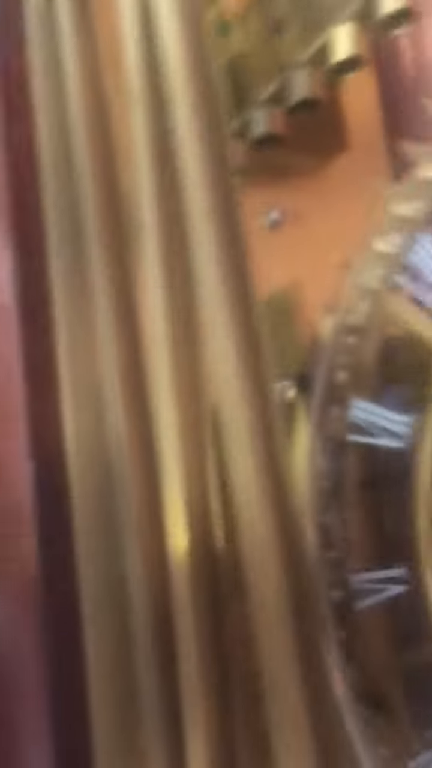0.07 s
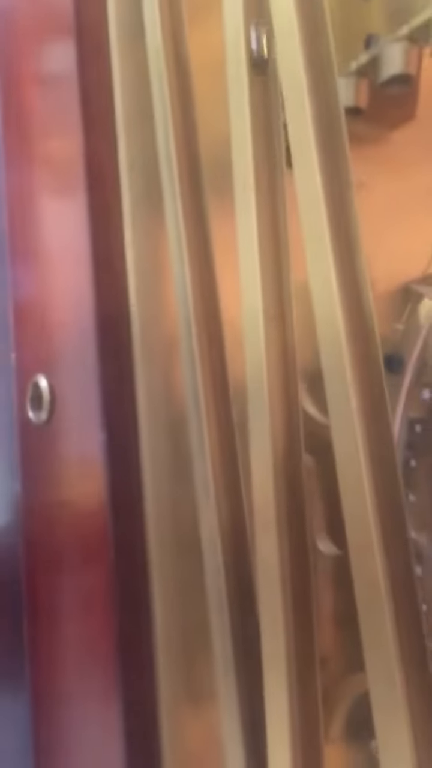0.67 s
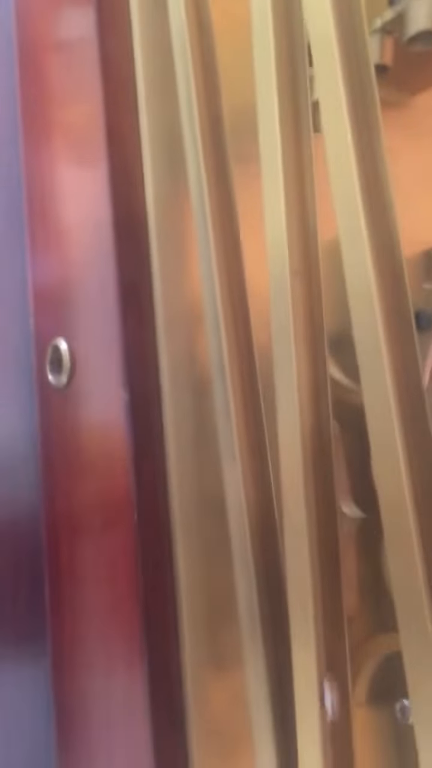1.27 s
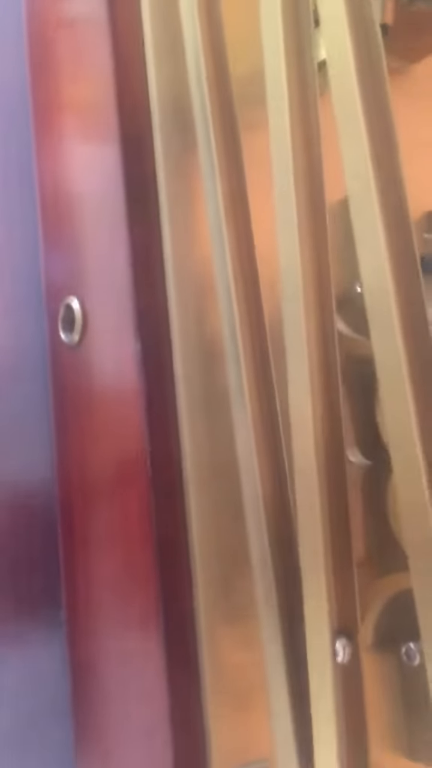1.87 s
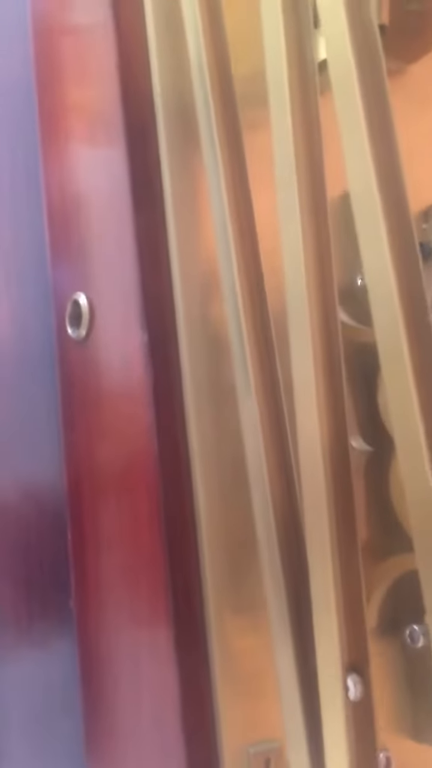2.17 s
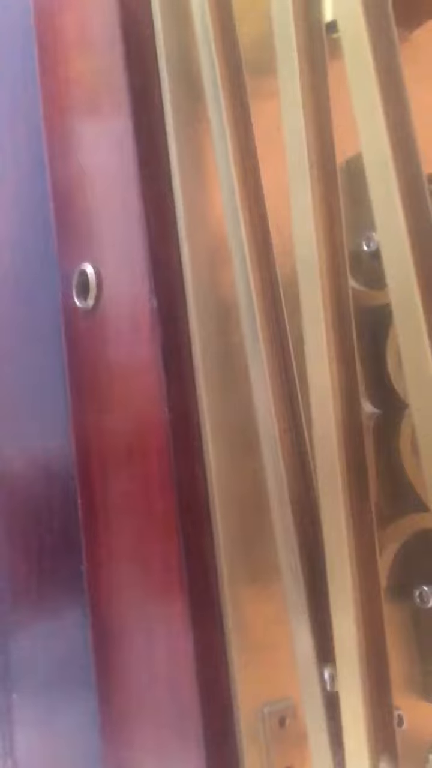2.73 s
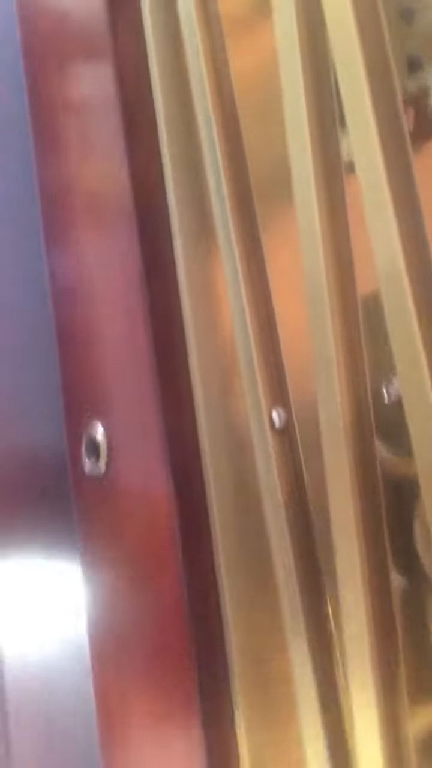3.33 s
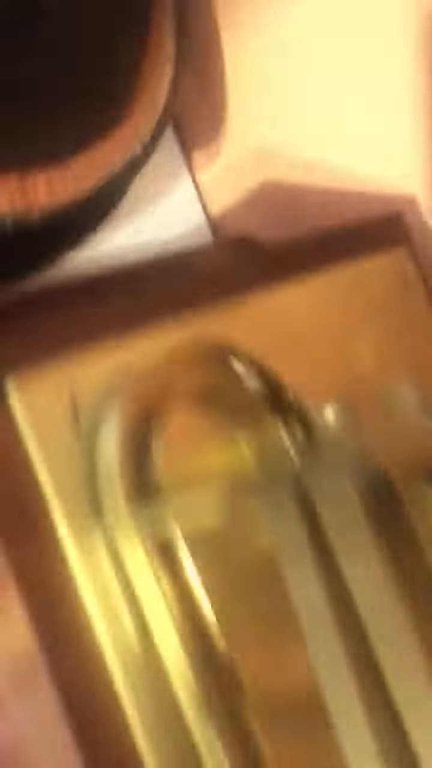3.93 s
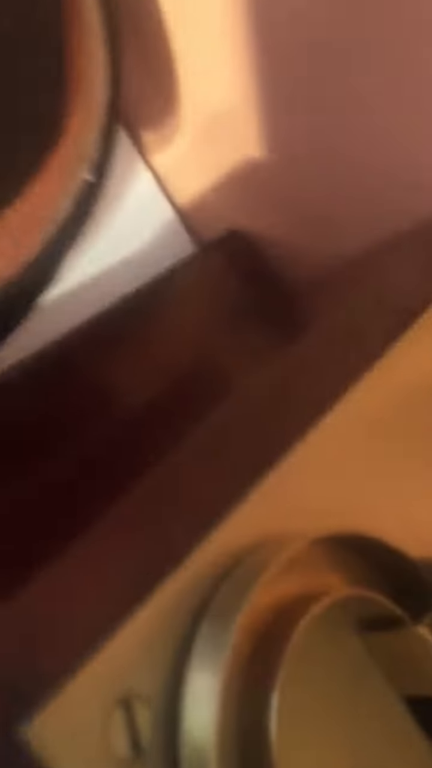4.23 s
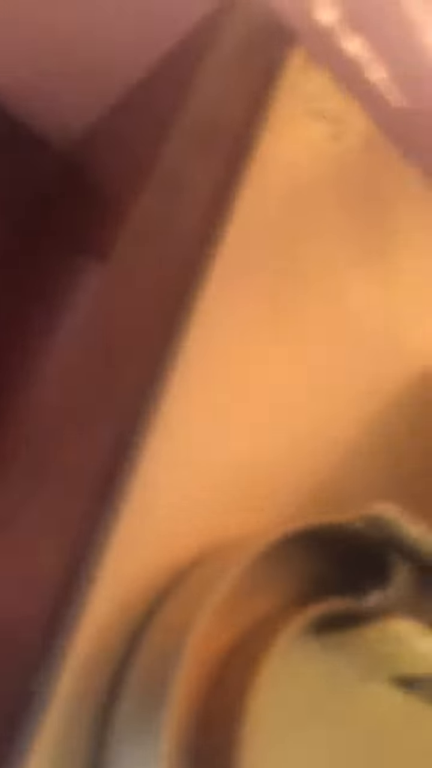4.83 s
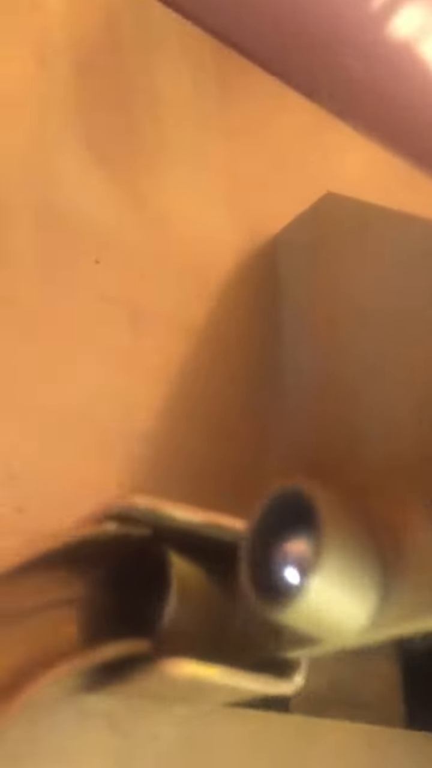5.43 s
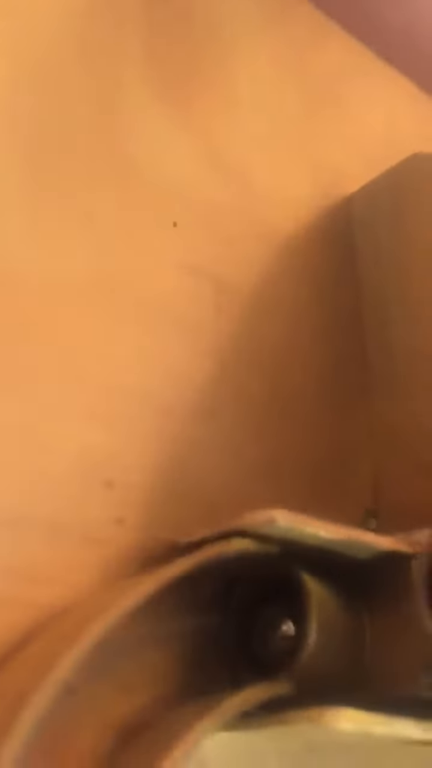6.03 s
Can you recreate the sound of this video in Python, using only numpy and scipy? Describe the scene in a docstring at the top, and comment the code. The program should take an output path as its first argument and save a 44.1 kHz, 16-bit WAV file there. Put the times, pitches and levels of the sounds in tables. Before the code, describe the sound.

A steel ball rattles and rolls along ringing brass tracks, then drops into a pocket as clockwork ticks and knocks in a wooden case.

```python
"""A small steel ball rattles out of a chute and rolls down a brass track, making the metal ring.
It clacks over a crossover, runs back along a second track, rounds a bend and drops into a pocket.
Two escapements (the ticking parts of clockwork), a catch and a lever, ping throughout, and the works
knock in their wooden case. Underneath are a low throb, about three a second, probably the drive
turning, a soft whirr and faint room air."""
import sys
import numpy as np
from scipy import signal
from scipy.fft import rfft, irfft
from scipy.io import wavfile
from scipy.ndimage import uniform_filter1d

SR = 44100
rng = np.random.default_rng(int(sys.argv[2]) if len(sys.argv) > 2 else 0)


def unload_audio(sound):
    """Save the sound as a 16-bit wav file, at the path given as the first command line argument."""
    columns = np.transpose(np.atleast_2d(sound))
    # keep every value between -1 and 1, then stretch to whole-number steps
    steps = np.round(np.clip(columns, -1, 1) * 32767)
    wavfile.write(sys.argv[1], SR, steps.astype(np.int16))


N = 269010
TIME = np.arange(N) / SR
FILTER_HZ = np.fft.rfftfreq(4096, 1 / SR)

# Levels in the tables are relative. A mode is a note that an object rings at, and its ring time is
# how long it takes to fade by 60 dB. "Low boost" turns the lower part of a sound up or down.

# Stretches of rolling. Each row: start in seconds, first level, last level and low boost in dB.
ROLLS = [(0, -33, -34.5, 5.5), (0.09, -28.5, -39.5, 6), (0.286, -67.5, -75.5, 5.5),
         (0.773, -37.5, -31.5, -1.5), (1.7, -51.5, -103.5, 1), (2.2, -84, -51, 7), (2.63, -42.5, -33.5, 5),
         (2.733, -59, -72, 4.5), (2.93, -62, -35, -2), (3.821, -39.5, -40, 5), (3.99, -34, -36.5, 2),
         (4.085, -43, -46.5, 3), (4.221, -61, -73, -1)]
STOP_S = 4.39
SPEED_POWER = 4.4  # how steeply the rolling noise grows with speed
DULL_PER_DB, BRISK_DB = 0.306, -27.5  # low boost added for each dB of rolling softer than BRISK_DB
# When the ball leaves the chute, the first track, the crossover and the return track, in seconds.
LEAVE_TIMES = [.6, 2.6, 2.9, 3.97]
# The ball drops and bounces. Each row: time in seconds, then level, low boost and ring gain in dB.
LANDINGS = [(.001, -28, 1.5, 3.5), (0.081, -6, 7.5, -13.5), (0.1311, -9.5, 5, -11), (0.175, -14.5, 6, -12),
            (0.207, -17.5, 6.5, -9.5), (.229, -23, -0.5, -5.5), (0.246, -25.5, 2, -4),
            (1.6576, -23, -4, 2.5), (1.672, -26.5, -1, 2), (2.6227, -16, -4, -6.5), (2.6337, -3, -1, -17.5),
            (2.6594, -8.5, 2.5, -14.5), (2.6913, -21, 2.5, -7.5), (3.988, -14.5, -5, -16),
            (4.2297, -14.5, -0.5, -21), (4.334, -22, 1, -26), (4.361, -36, 3, -19)]
SECOND_RAIL_S, SECOND_RAIL_DB = .0068, -5.5  # a landing ball meets one rail, then the other
# Light clacks at lips and joints. Each row: time in seconds, level in dB.
CLACKS = [(0.7047, -53.5), (0.768, -39.5), (0.7984, -35), (1.6255, -22), (2.7559, -39), (2.925, -57.5),
          (3.029, -46.5), (3.116, -52), (3.1766, -41), (3.326, -38.5), (3.3914, -39), (3.8349, -27.5),
          (3.859, -29), (4.06, -41)]
CLACK_LOW_DB, CLACK_RING_DB = -3.5, 4

# Clear modes of each part's frame (low) and rails (high). Each row: pitch in Hz, level in dB.
CHUTE_FRAME = [(1233, -58.5), (2272, -57.5), (2686, -67), (3128, -49.5), (3386, -60), (3704, -67.5),
               (4075, -59), (4151, -56), (4398, -61.5), (4597, -62.5), (4815, -48.5), (5335, -58),
               (5626, -57.5), (5830, -62)]
CHUTE_RAILS = [(6309, -46), (6546, -42), (6724, -44), (6826, -38.5), (7031, -39.5), (7106, -35.5),
               (7305, -44.5), (7644, -52), (8123, -41.5), (8333, -45.5), (8861, -48.5), (9109, -52.5),
               (9421, -65), (9582, -60)]
FIRST_FRAME = [(370, -70.5), (620, -68), (1020, -75.5), (1244, -59.5), (1367, -65.5), (2046, -65.5),
               (2169, -67.5), (2277, -66), (2649, -64), (2760, -78), (2923, -65), (3230, -61), (3779, -68),
               (4250, -75), (4570, -65), (4732, -73), (5254, -60), (5631, -71)]
FIRST_RAILS = [(6158, -54.5), (6277, -45), (6541, -46), (6638, -49), (6724, -42), (6821, -47.5),
               (7009, -37.5), (7101, -48.5), (7316, -57.5), (7467, -42), (7795, -61.5), (8134, -47),
               (8258, -55), (8344, -42.5), (8678, -41.5), (9109, -53.5), (9582, -68)]
CROSS_FRAME = [(1244, -52.5), (1890, -55.5), (2401, -77.5), (2589, -57.5), (2950, -68), (3219, -45.5),
               (3542, -69), (3828, -76), (4204, -74), (4549, -59), (5313, -61), (5857, -65)]
CROSS_RAILS = [(6358, -63.5), (6535, -55.5), (6745, -47.5), (6783, -48), (7025, -41.5), (7343, -50.5),
               (7564, -50.5), (7768, -40.5), (8113, -50.5), (8242, -69), (8349, -46), (8484, -51),
               (8640, -55.5), (8958, -53)]
RETURN_FRAME = [(600, -64), (1020, -66.5), (1250, -62), (1340, -69.5), (1863, -72), (2030, -72),
                (2272, -73), (2821, -71), (3252, -60.5), (3483, -92), (4075, -86), (4597, -75), (4775, -63),
                (5308, -75), (5825, -65)]
RETURN_RAILS = [(6013, -58), (6385, -49.5), (6751, -47), (6858, -42), (6950, -48.5), (7171, -52),
                (7483, -61), (7779, -54), (8021, -52.5), (8236, -60), (8349, -47.5), (8640, -61.5)]
BEND_FRAME = [(1717, -62), (2062, -65), (2315, -46), (2611, -72), (2815, -64), (3246, -78.5), (4091, -69),
              (4447, -75), (4818, -71), (5841, -79)]
BEND_RAILS = [(6794, -54), (7364, -60), (7477, -47), (7612, -48), (8027, -49.5), (8226, -60), (8640, -44),
              (8721, -48), (8969, -72)]
# The crowd of weaker modes between the clear ones. Each row: frequency in Hz, level in dB.
CHUTE_CROWD = [(88, -50), (150, -25), (240, -25), (448, -30), (605, -23.5), (800, -38.5), (900, -21.5),
               (1050, -19.5), (1490, -25), (2570, -14.5), (4300, -15.5), (5390, -11), (7150, 2), (9160, -4),
               (10200, -27.5), (13200, -57), (22000, -120)]
FIRST_CROWD = [(150, -49), (230, -18), (400, -30), (664, -24.5), (1070, -18), (1240, -32), (1510, -22),
               (2090, -13.5), (4010, -14), (4990, -13.5), (7240, 2.5), (8990, -19.5), (9420, -18.5),
               (10200, -63.5), (13200, -91), (22000, -120)]
CROSS_CROWD = [(150, -58.5), (250, -27), (551, -22), (780, -29), (964, -11.5), (1090, -24.5), (1250, -19.5),
               (1510, -19.5), (2640, -9.5), (3890, -18), (7580, 1), (8990, -3.5), (10200, -36.5),
               (13200, -71), (22000, -120)]
RETURN_CROWD = [(150, -67), (250, -28), (450, -27.5), (590, -16.5), (750, -36), (980, -7), (1140, -50),
                (1270, -10), (1560, -36), (1950, -9.5), (2640, -18), (5070, -12.5), (7020, 2), (8990, -2),
                (10200, -40), (13200, -65), (22000, -120)]
BEND_CROWD = [(150, -24), (250, -10), (411, -41), (535, -13.5), (729, -13.5), (1180, -21), (1290, -18),
              (2600, -6.5), (5070, -12), (7350, 4), (8990, -2), (9720, -26), (10200, -77), (13200, -105),
              (22000, -120)]
# Gaps where a part lacks modes. Each row: centre in Hz, half-width in Hz, gain in dB (mostly a cut).
CHUTE_GAPS = [(1620, 29, -10), (1927, 55, -15), (2978, 70, -13.5), (3570, 60, -15), (3880, 210, -6),
              (4220, 87, -8.5), (5200, 360, -5), (5730, 84, -8.5), (6900, 130, -16), (7740, 110, -14)]
FIRST_GAPS = [(800, 100, -13.5), (1510, 60, -6.5), (2436, 110, -8), (2993, 54, -2), (3540, 94, -20),
              (4050, 150, -29), (4343, 63, -24.5), (4796, 53, -10.5), (5080, 60, -4), (5600, 91, -12),
              (5850, 56, -12.5), (7200, 23, -10), (7870, 130, -9)]
CROSS_GAPS = [(1120, 30, -12.5), (1550, 45, -14.5), (2230, 14, 3), (2900, 40, -11.5), (3460, 34, -23),
              (3855, 60, -13), (3920, 100, -26.5), (5140, 120, -26), (5640, 60, -14.5), (6100, 70, -11),
              (9340, 50, -12)]
RETURN_GAPS = [(1550, 99, 1), (3010, 47, -18), (3810, 91, -17), (4260, 73, -21), (5000, 50, -6),
               (5080, 140, -14.5), (5440, 68, -10), (6200, 49, -11)]
BEND_GAPS = [(1160, 41, -14), (3110, 160, -16), (3730, 85, 0), (4260, 26, -14), (4890, 53, -15)]
# How long the clear modes and the crowd ring; each part stretches the crowd's times by its sustain.
# Each row: frequency in Hz, ring time in seconds.
CLEAR_RING_TIMES = [(500, 0.15), (2000, 0.086), (3200, 0.18), (5000, 0.16), (7000, 0.22), (9100, 0.19)]
CROWD_RING_TIMES = [(300, 0.12), (1200, 0.098), (4000, 0.075), (7000, 0.083), (10000, 0.044)]
# Modes of the chute after the first landing, the hollow pocket, the small catch and the longer lever.
# Each row: pitch in Hz, level in dB, ring time in seconds.
CHUTE_MODES = [(3110, -35.5, 0.42), (4020, -43, 0.47), (4130, -43.5, 0.27), (5040, -47.5, .4),
               (7486, -23.5, .25), (7650, -38.5, 0.23), (9200, -36, .25)]
POCKET_MODES = [(303, -3.5, 0.072), (508, 2, 0.09), (610, -13, 0.068), (819, 3, 0.14), (1060, -13, .14),
                (1260, -6, .06), (1380, -17, .12), (1605, -3, 0.086), (1790, -13, 0.19), (1910, -18, .08),
                (2280, -4.5, 0.089), (2620, 0.5, 0.096), (2800, -13, .08), (3450, -11, .05)]
CATCH_MODES = [(2080, -4.5, 0.056), (2688, -21, 0.05), (4780, 9.5, 0.033), (5210, -12, 0.091),
               (5890, -2, 0.017), (7080, -18, .03), (8580, -13.5, 0.027)]
LEVER_MODES = [(1670, -16, 0.13), (2095, 11.5, 0.065), (2470, -4.5, .1), (3182, 0, 0.15),
               (4520, -13.5, 0.025), (5200, 10.5, 0.037), (7500, -1, 0.032), (8400, -3.5, 0.16)]
# The ball hits the pocket. Each row: time in seconds, level in dB, treble tilt in dB per octave.
POCKET_DROPS = [(4.2325, -40, 4.5), (4.2745, -47, -6), (4.3305, -40, -2)]

# Each escapement's uneven beat, in seconds: first tick, tick to tock, tick to tick.
CATCH_BEAT = (.370, .431, .8115)
LEVER_BEAT = (.53, .476, .9794)
CATCH_DB, LEVER_DB, TOCK_DB = -52, -55, 4  # the lever's tock is TOCK_DB heavier than its tick
# The scrape as each one slides home. Each row: frequency in Hz, level in dB.
CATCH_SCRAPE = [(500, 10.5), (2000, 14), (3300, 10), (4900, 0), (6200, -3), (8800, -16.5), (9700, -32.5)]
LEVER_SCRAPE = [(500, -26), (2000, 1), (4400, 21), (6200, 3.5), (7600, 9.5), (8700, -5), (9400, -28)]
# Each one grows louder as the listener comes near. Each row: time in seconds, gain in dB.
CATCH_NEARNESS = [(4.8, -2.5), (5.24, 0), (5.65, -1.5)]
LEVER_NEARNESS = [(4.45, -8.5), (4.9, -3.5), (5.4, -0.5), (5.9, -1)]

# The works knock in the case. Each row: time in seconds, level in dB, treble tilt in dB per octave,
# the struck part's final pitch in Hz, its level in dB.
KNOCKS = [(0.375, -47.5, 6.5, 666, -45.5), (0.645, -50, -3.5, 572, -47), (.992, -36.5, 5, 595, -46),
          (1.486, -45.5, 2.5, 646, -48), (1.809, -57, -7, 352, -47), (2.099, -38.5, 2.5, 770, -46.5),
          (2.19, -53, -4.5, 442, -58), (2.484, -60, 5, 600, -51.5), (3.212, -38.5, 2.5, 690, -47),
          (3.347, -50, -3, 590, -53.5), (3.467, -51, 9, 584, -52), (3.711, -46, -1, 636, -45),
          (4.234, -43, 10, 570, -50), (4.274, -34.5, 6, 326, -45), (4.327, -35, 5.5, 497, -42),
          (4.522, -52, -7.5, 367, -59), (4.819, -40, 2.5, 767, -47.5), (4.917, -36.5, 1.5, 874, -49),
          (5.279, -48.5, -10, 567, -49), (5.441, -33.5, 2.5, 473.5, -34.5), (5.671, -41.5, 0.5, 838, -62.5),
          (5.791, -67, -13.5, 285, -57), (5.932, -42.5, 5, 826, -52.5), (6.062, -46, -6.5, 525, -54)]
# The centres of four bands that shape a knock, in Hz.
BAND_HZ = [300, 800, 2300, 6000]
# The level in each of those bands in dB, for knocks of the works and of the lever.
WORKS_BANDS_DB = [-9, -1, -17.5, -35]
LEVER_BANDS_DB = [-58.5, -42, -52.5, -54]
# Modes of the wooden case. Each row: pitch in Hz, level in dB.
CASE_MODES = [(290, -16), (445, 3), (510, 5.5), (565, 5.5), (630, 6), (813, -0.5), (1020, 10), (1330, 3),
              (1580, 4.5), (1900, -7), (2300, 2), (2620, -0.5), (3200, 6.5), (4300, 14), (5250, 14.5),
              (8900, 20.5)]
# How long the case rings. Each row: frequency in Hz, ring time in seconds.
CASE_RING_TIMES = [(200, 0.31), (600, 0.18), (1400, 0.17), (4000, 0.14), (9000, 0.085)]
# Dull bumps on the case. Each row: time in seconds, level in dB, pitch in Hz, snap gain in dB.
BUMPS = [(4.238, -17.5, 204, -10), (4.95, -19.5, 207, -16), (5.193, -17.5, 196, -20)]

# The drive runs in two spells. Each row: first turn and last turn in seconds.
DRIVE_SPELLS = [(.09, 4.25), (4.889, 5.85)]
TURN_S, THROB_DB, SAG_DB, LAST_TURN_DB = .32, -40.5, -2.5, -2.5
# The course of one throb. Each row: seconds since its start, pitch in Hz, level in dB.
THROB_SHAPE = [(0, 164, -21), (0.042, 123.7, -2.5), (0.095, 104.6, 0.5), (0.124, 69, 1.5),
               (0.166, 68.26, 6), (0.222, 64, -1), (.27, 62.7, -13.5), (.34, 63, -10)]
# Low modes that each throb sets booming.
# Each row: pitch in Hz, level in dB, seconds until the peak, half-length in seconds.
BOOMS = [(74.55, -3, 0.03, 0.13), (105, -14, 0.028, 0.053), (118, -14, 0.16, 0.058)]
# Held low hums. Each row: start and end in seconds, pitch in Hz, level in dB.
HUMS = [(2.352, 2.83, 101.3, -49.5), (4.05, 4.398, 118, -52.5), (4.432, 4.66, 66.6, -48.5),
        (5.55, 6.2, 118, -50), (5.561, 6.203, 68.7, -57)]
# The whirr of the works and the air of the room. Each row: frequency in Hz, level in dB.
WHIRR_SPECTRUM = [(76, -26.5), (130, 0), (164, -11.5), (220, -22.5), (354, -18.5), (410, -20), (717, -26),
                  (842, -27.5), (2500, -48), (3250, -63.5), (5500, -120)]
AIR_SPECTRUM = [(76, -32.5), (130, 1.5), (274, -20), (408, -18), (447, -21), (717, -18), (1780, -21.5),
                (2650, -27), (8040, -34), (10000, -44.5), (13000, -92), (22000, -120)]
# The faint hiss dips while the ball rolls, then comes back up. Each row: time in seconds, gain in dB.
AIR_DIP = [(0, -0.5), (1.8, -4.5), (4.2, -2), (4.6, 0.5)]


def ball():
    """Rolling and blows shake the chute, first track, crossover, return track and bend in turn."""
    roll = rolling()
    ring_force, click_force = clacks()
    forces = np.array([roll + ring_force, roll + click_force])
    place = np.searchsorted(LEAVE_TIMES, TIME)
    chute, first, cross, back, bend = (forces * (place == k) for k in range(len(LEAVE_TIMES) + 1))
    return (track(*chute, CHUTE_FRAME, CHUTE_RAILS, CHUTE_CROWD, CHUTE_GAPS,
                  clear_db=2.0, frame_db=-11.5, click_db=-17.5, sustain=0.81)
            + track(*first, FIRST_FRAME, FIRST_RAILS, FIRST_CROWD, FIRST_GAPS,
                    clear_db=8.5, frame_db=0.5, click_db=-9.5, sustain=1.3)
            + track(*cross, CROSS_FRAME, CROSS_RAILS, CROSS_CROWD, CROSS_GAPS,
                    clear_db=0.0, frame_db=-7.0, click_db=-22, sustain=0.71)
            + track(*back, RETURN_FRAME, RETURN_RAILS, RETURN_CROWD, RETURN_GAPS,
                    clear_db=1.0, frame_db=-4.5, click_db=-18.5, sustain=2.0)
            + track(*bend, BEND_FRAME, BEND_RAILS, BEND_CROWD, BEND_GAPS,
                    clear_db=-6.5, frame_db=-11.0, click_db=-13.5, sustain=1.6))


def track(ring_force, click_force, frame, rails, crowd, gaps, clear_db, frame_db, click_db, sustain):
    """Brass answers a push with a click, a crowd of weak modes and a few clear ones."""
    gaps_db = sum(db * np.exp(-((FILTER_HZ - hz) / width) ** 2) for hz, width, db in gaps)
    click = unit(shaped_click(look_up(crowd, FILTER_HZ) + gaps_db))
    clear = clear_ring([(hz, db + frame_db) for hz, db in frame] + list(rails), CLEAR_RING_TIMES)
    dense = crowd_ring([(hz, sustain * ring_s) for hz, ring_s in CROWD_RING_TIMES])
    dense = unit(signal.fftconvolve(dense, click))[:len(clear)]
    ringing = signal.oaconvolve(ring_force, unit(dense + amp(clear_db) * clear))[:N]
    return ringing + amp(click_db) * signal.oaconvolve(click_force, click)[:N]


def rolling(bumps_per_s=900, spread_db=2.5, wobble_db=0.5):
    """The ball runs over tiny bumps in the metal, pressing unevenly as it turns."""
    level_db, low_db = rolling_levels()
    bumps = (rng.random(N) < bumps_per_s / SR) * rng.choice([-1, 1], N)
    heights = amp(spread_db * np.minimum(rng.exponential(1, N), 4))
    pressure = amp(3 * wander(160))
    # narrow bands of the rolling noise swell and fade at random
    grit = patchy(bumps * heights * pressure, depth_db=7.5, width_bins=3)
    grit = patchy(grit, depth_db=4, width_bins=8)
    # the ball's weight stays the same, so even out the strength
    grit /= np.sqrt(abs(uniform_filter1d(grit ** 2, size=2500)) + 1e-12)
    return boost_lows(grit * amp(level_db + wobble_db * wander(25)), low_db)


def rolling_levels(blend_s=0.014):
    """Level and low boost in dB: speed changes evenly in each stretch; slower is softer and duller."""
    level_db, low_db = np.full(N, -120.), np.zeros(N)
    ends = [roll[0] for roll in ROLLS[1:]] + [STOP_S]
    for (start, from_db, to_db, boost_db), end in zip(ROLLS, ends):
        on = (TIME >= start) & (TIME < end)
        speed = np.interp(TIME[on], [start, end], amp(np.array([from_db, to_db]) / SPEED_POWER))
        level_db[on] = SPEED_POWER * 20 * np.log10(speed)
        low_db[on] = boost_db + DULL_PER_DB * (BRISK_DB - level_db[on])
    return uniform_filter1d(np.array([level_db, low_db]), round(blend_s * SR))


def clacks(chatter=1.25, chatter_s=0.0034, blow_db=28):
    """Each blow is one hard contact and a few milliseconds of chatter between the two rails."""
    blows = [(s, db, CLACK_LOW_DB, CLACK_RING_DB) for s, db in CLACKS]
    for s, db, low_db, ring_db in LANDINGS:
        blows += [(s, db, low_db, ring_db), (s + SECOND_RAIL_S, db + SECOND_RAIL_DB, low_db, ring_db)]
    ring_force, click_force, t = np.zeros(N), np.zeros(N), np.arange(SR // 40) / SR
    for s, db, low_db, ring_db in blows:
        blow = chatter * unit(rng.standard_normal(len(t)) * np.exp(-t / chatter_s))
        blow[20] += 1  # the hard contact
        blow = amp(db + blow_db) * boost_lows(unit(blow), low_db)
        add(ring_force, s, amp(ring_db) * blow)
        add(click_force, s, blow)
    return ring_force, click_force


def boost_lows(force, low_db, split_hz=4800):
    """A heavier contact puts more into the low modes of the frame."""
    low = signal.sosfiltfilt(signal.butter(3, split_hz, fs=SR, output="sos"), force)
    return force + (amp(low_db) - 1) * low


def pocket(rise_s=0.001):
    """The ball drops into the pocket, which rings hollow; the rebounds sound duller."""
    out, t = np.zeros(N), np.arange(SR // 3) / SR
    for s, level_db, tilt in POCKET_DROPS:
        modes = [(hz, db + level_db + tilt * np.log2(hz / BAND_HZ[1]), ring_s)
                 for hz, db, ring_s in POCKET_MODES]
        add(out, s, struck(modes, t) * (1 - np.exp(-t / rise_s)))
    return out


def catch():
    """The small catch slides home with a short ping on each beat."""
    strikes = [(s, CATCH_DB + np.interp(s, *np.transpose(CATCH_NEARNESS))) for s in beats(*CATCH_BEAT)]
    return pings(strikes, CATCH_MODES, CATCH_SCRAPE, rise_s=0.002, scrape_db=-1.5, scrape_s=0.011)


def lever():
    """The longer lever drops and rings on each beat."""
    strikes = [(s, LEVER_DB + db) for s, db in lever_beats()]
    return pings(strikes, LEVER_MODES, LEVER_SCRAPE, rise_s=0.0016, scrape_db=7.5, scrape_s=0.0073)


def lever_beats():
    """Time and gain in dB of the lever's beats, light and heavy by turns."""
    return [(s, np.interp(s, *np.transpose(LEVER_NEARNESS)) + TOCK_DB * (k % 2))
            for k, s in enumerate(beats(*LEVER_BEAT))]


def beats(first_s, tock_s, period_s):
    """The times of an escapement's ticks and tocks."""
    ticks = np.arange(first_s, N / SR, period_s)
    both = np.sort(np.concatenate([ticks, ticks + tock_s]))
    return both[both < N / SR]


def pings(strikes, modes, scrape_shape, rise_s, scrape_db, scrape_s):
    """A light metal part scrapes into place and rings, a little differently each time."""
    out, t = np.zeros(N), np.arange(SR // 3) / SR
    for s, level_db in strikes:
        ring = np.zeros(len(t))
        for hz, db, ring_s in modes:
            fade = amp(db + rng.uniform(-2.5, 2.5) - 60 * t / ring_s)
            ring += fade * sine(hz * rng.uniform(.98, 1.02) * t)
        scrape = colour(rng.standard_normal(len(t)), scrape_shape)
        scrape *= amp(scrape_db) * np.exp(-t / scrape_s) / scrape.std()
        add(out, s, amp(level_db) * (ring + scrape) * (1 - np.exp(-t / rise_s)))
    return out


def case_knocks(gain_db=21, rise_s=0.0014):
    """Levers and wheels knock inside the wooden case; each knock has its own brightness."""
    out, t = np.zeros(N), np.arange(SR // 2) / SR
    octaves = np.log2(np.array(BAND_HZ) / BAND_HZ[1])
    blows = [(s, db + np.array(WORKS_BANDS_DB) + tilt * octaves) for s, db, tilt, _, _ in KNOCKS]
    blows += [(s, db + np.array(LEVER_BANDS_DB)) for s, db in lever_beats()]
    for s, band_db in blows:
        per_hz = band_db - 10 * np.log10(np.array(BAND_HZ) / (SR / 2))  # higher bands are wider
        shape = [(70, per_hz[0] - 25), *zip(BAND_HZ, per_hz),
                 (9000, per_hz[3] - 3), (9600, per_hz[3] - 22)]
        # each part strikes another spot and favours other modes
        spot_db = 4.5 * np.clip(rng.standard_normal(200), -2, 1.3)
        spot_db = np.interp(FILTER_HZ, np.linspace(0, SR / 2, 200), spot_db)
        click = shaped_click(look_up(shape, FILTER_HZ) + spot_db)
        dense = crowd_ring(CASE_RING_TIMES)[:len(t)]
        ring = dense + amp(-2.5) * clear_ring(CASE_MODES, CASE_RING_TIMES)
        rattle = amp(3 * wander(220)[:len(t)])
        ring = unit(ring * rattle * (1 - np.exp(-t / rise_s)))  # the case takes a moment to fill
        add(out, s, amp(gain_db) * signal.fftconvolve(ring, click))
    return delay_bass(out)


def delay_bass(x, lag_s=0.01197, corner_hz=450):
    """Low notes cross the wooden case more slowly than high ones."""
    delay = lag_s * np.exp(-np.fft.rfftfreq(len(x), 1 / SR) / corner_hz)
    cycles = np.cumsum(delay) * SR / len(x)
    return irfft(rfft(x) * np.exp(-2j * np.pi * cycles), len(x))


def knock_notes(slide=.14, slide_s=0.017, rise_s=0.0042, decay_s=.024):
    """Each struck part of the works gives a short, rough note that slides down as it dies."""
    out, t = np.zeros(N), np.arange(SR // 4) / SR
    fade = (1 - np.exp(-t / rise_s)) * np.exp(-t / decay_s)
    for s, _, _, hz, db in KNOCKS:
        cycles = np.cumsum(hz * (1 + slide * np.exp(-t / slide_s))) / SR
        rough = 1 + .5 * wander(130)[:len(t)]
        add(out, s, amp(db) * fade * rough * sine(cycles))
    return out


def case_bumps(decay_s=0.0013, snap_hz=1400):
    """A soft blow gives a dull snap and a brief pulse of the case's lowest mode."""
    out, t = np.zeros(N), np.arange(SR // 10) / SR
    muffle = signal.butter(3, snap_hz, fs=SR, output="sos")
    for s, db, hz, snap_db in BUMPS:
        noise = signal.sosfilt(muffle, rng.standard_normal(len(t)))
        snap = amp(snap_db) * noise / noise.std()
        add(out, s, amp(db) * np.exp(-t / decay_s) * (snap - np.sin(2 * np.pi * hz * t)))
    return out


def drive_throb(echo_gain=0.32, echo_s=0.051, early_s=0.13):
    """Each turn gives a shuddering low tone that falls into a boom; the room echoes its start."""
    times, hz, db = np.transpose(THROB_SHAPE)
    out, t = np.zeros(N), np.arange(0, times[-1], 1 / SR)
    cycles = np.cumsum(np.interp(t, times, hz)) / SR
    soft_ends = signal.windows.tukey(len(t), .1)
    swell = amp(np.interp(t, times, db)) * soft_ends
    early = np.exp(-(t / early_s) ** 4)
    for start, level_db in drive_turns():
        shudder = 1 + .4 * early * wander(55)[:len(t)]
        add(out, start, amp(level_db) * swell * shudder * sine(cycles))
        add(out, start + echo_s, echo_gain * amp(level_db) * swell * early * sine(cycles))
        for boom_hz, boom_db, peak_s, half_s in BOOMS:
            boom = np.exp(-((t - peak_s) / half_s) ** 2) * sine(boom_hz * t)
            add(out, start, amp(level_db + boom_db) * boom * soft_ends)
    return out


def drive_turns():
    """Time and level in dB of each turn: the throb weakens through a spell, most on its last turn."""
    for first, last in DRIVE_SPELLS:
        for s in np.arange(first, last + TURN_S / 2, TURN_S):
            progress, is_last = (s - first) / (last - first), s > last - TURN_S / 2
            yield s, THROB_DB + SAG_DB * progress + LAST_TURN_DB * is_last


def drive_hum(rumble_db=-56):
    """The drive holds a few low hums over a deep rumble."""
    out = np.zeros(N)
    for start, end, hz, db in HUMS:
        t = np.arange(0, end - start, 1 / SR)
        swell = amp(db) * np.sqrt(2) * signal.windows.tukey(len(t), .3)
        add(out, start, swell * np.sin(2 * np.pi * hz * t))
    rumble = steady_noise([(30, -23.5), (52, -12.5), (66, 8.0), (85, 2.5),
                           (125, -7.5), (170, -12.5), (400, -56.5)])
    return out + amp(rumble_db + rest_db()) * rumble


def whirr_and_air(whirr_db=-63.0, air_db=-68.5):
    """The running works whirr unevenly over faint room air."""
    air = amp(air_db + np.interp(TIME, *np.transpose(AIR_DIP))) * steady_noise(AIR_SPECTRUM)
    whirr = unit(patchy(steady_noise(WHIRR_SPECTRUM), depth_db=5.5, width_bins=2)) * np.sqrt(N)
    waver_db = 2 * wander(14)
    return air + amp(whirr_db + waver_db + rest_db()) * whirr


def rest_db():
    """The works rest briefly after the ball lands in the pocket, then come back louder."""
    return np.interp(TIME, [4.6, 4.72, 4.82, 4.88], [0.0, -13.5, -13.0, 4.0])


def struck(modes, t):
    """A struck object rings: one fading sine wave for each mode."""
    return sum(amp(db - 60 * t / ring_s) * sine(hz * t) for hz, db, ring_s in modes)


def clear_ring(modes, ring_times):
    """Separate modes, each fading at the speed that its pitch gives; their levels set their energy."""
    t = np.arange(SR // 2) / SR
    hz, db = np.transpose(modes)[:, :, None]
    ring_s = look_up(ring_times, hz)
    fades = amp(db - 60 * t / ring_s) / np.sqrt(ring_s)
    waves = np.sin(2 * np.pi * (hz * t + rng.random(hz.shape)))
    return unit((fades * waves).sum(0))


def crowd_ring(ring_times):
    """A crowd of modes: noise in which each band fades at its own speed."""
    hz, t, bands = signal.stft(rng.standard_normal(SR // 2), SR, nperseg=256)
    fades = amp(-60 * t / look_up(ring_times, hz)[:, None])
    return unit(signal.istft(bands * fades, SR)[1])


def shaped_click(gain_db, size=4096):
    """The shortest click that has these gains at the frequencies in FILTER_HZ."""
    log_gain = np.log(amp(np.maximum(gain_db, gain_db.max() - 80)))
    mirrored = np.concatenate([log_gain, log_gain[-2:0:-1]])
    spectrum = np.exp(np.conj(signal.hilbert(mirrored)))
    return np.fft.ifft(spectrum).real[:size // 2]


def patchy(x, depth_db, width_bins):
    """Makes narrow frequency bands swell and fade on their own."""
    bands = signal.stft(x, nperseg=1024, noverlap=768)[2]
    patches = uniform_filter1d(rng.standard_normal(bands.shape), size=width_bins, axis=0)
    for frames in (13, 3):  # smooth twice over time
        patches = uniform_filter1d(patches, size=frames, axis=1)
    gain = amp(depth_db * np.clip(patches / patches.std(), -2.5, 1.2))
    return signal.istft(bands * gain, nperseg=1024, noverlap=768)[1][:N]


def steady_noise(spectrum):
    """Noise with this spectrum and an average power of 1."""
    return unit(colour(rng.standard_normal(N), spectrum)) * np.sqrt(N)


def colour(x, spectrum):
    """Filters a sound by rows of frequency in Hz and gain in dB."""
    return irfft(rfft(x) * amp(look_up(spectrum, np.fft.rfftfreq(len(x), 1 / SR))), len(x))


def wander(per_s):
    """A random curve, mostly between -1 and 1, that heads for a new value per_s times a second."""
    return np.interp(TIME * per_s, np.arange(2000), rng.standard_normal(2000))


def sine(cycles):
    """A sine wave that starts at a random point in its cycle."""
    return np.sin(2 * np.pi * (cycles + rng.random()))


def look_up(table, hz):
    """Reads between the rows of a table, with frequency spaced in octaves."""
    row_hz, values = np.transpose(table)
    return np.interp(np.log(hz + 1), np.log(row_hz + 1), values)


def amp(db):
    """Turns decibels into a gain."""
    return 10 ** (np.asarray(db) / 20)


def unit(x):
    """Scales a sound to a total energy of 1."""
    return x / np.sqrt(np.sum(x ** 2) + 1e-20)


def add(mix, start_s, sound):
    """Mixes a sound in at a given time."""
    part = mix[max(round(start_s * SR), 0):][:len(sound)]
    part += sound[:len(part)]


def scene():
    """Ball, clockwork and room, in one channel."""
    ticking = catch() + lever()
    ball_run = ball() + struck(CHUTE_MODES, TIME) + pocket()
    knocking = case_knocks() + knock_notes() + case_bumps()
    background = drive_throb() + drive_hum() + whirr_and_air()
    return (ball_run + ticking + knocking + background)[None]


def record(dry):
    """Cuts the treble above 9750 Hz."""
    low_pass = signal.firwin(255, 9750, window=("kaiser", 7), fs=SR)
    return signal.oaconvolve(dry, low_pass[None], "same")


dry = scene()
out = record(dry)
unload_audio(out)
```